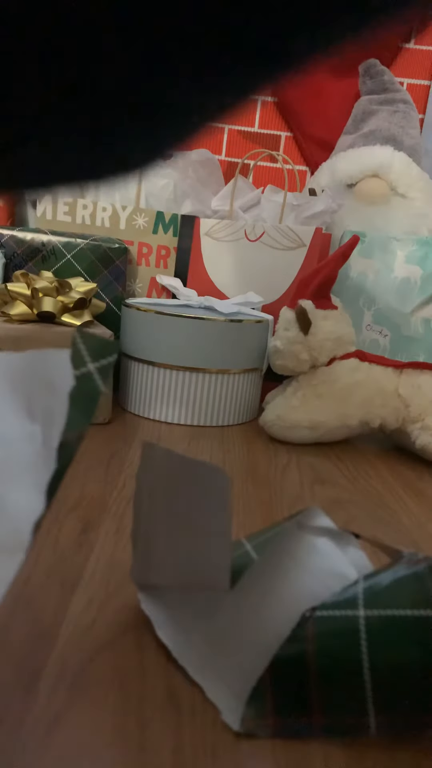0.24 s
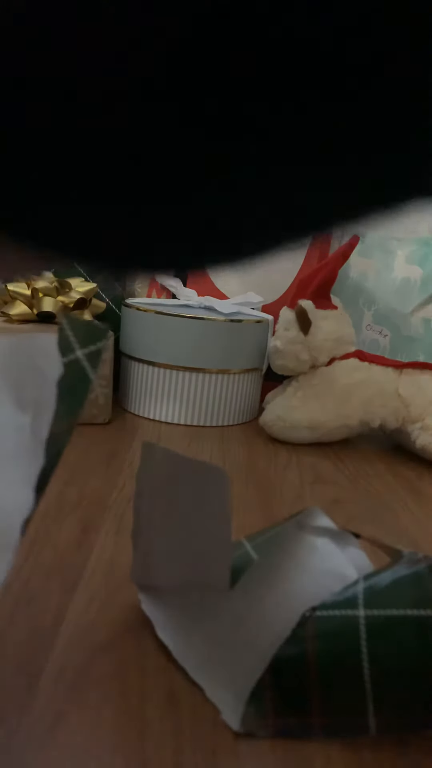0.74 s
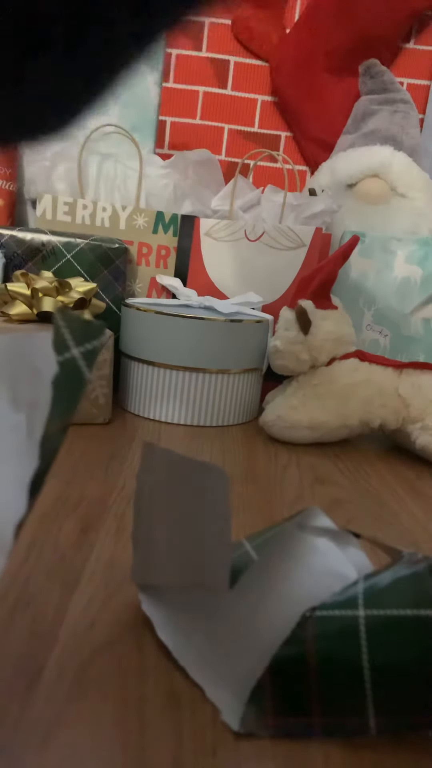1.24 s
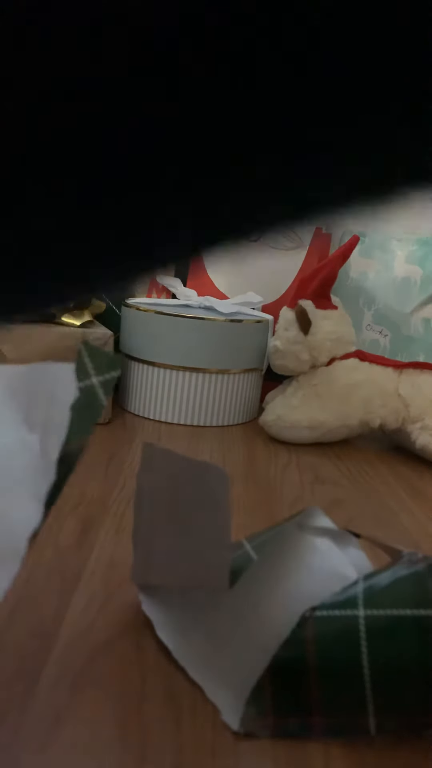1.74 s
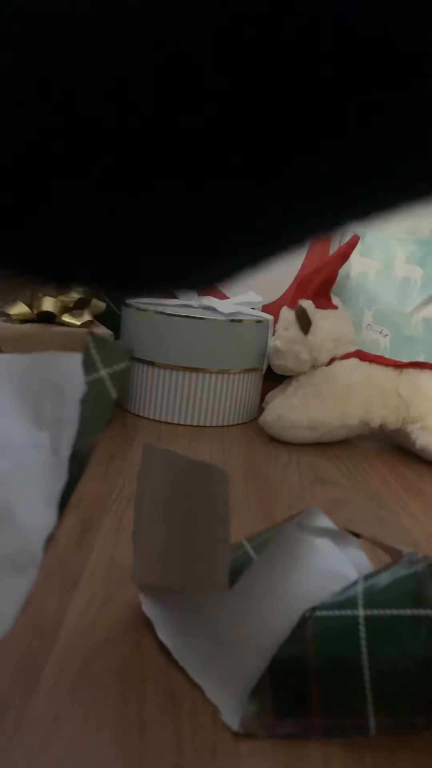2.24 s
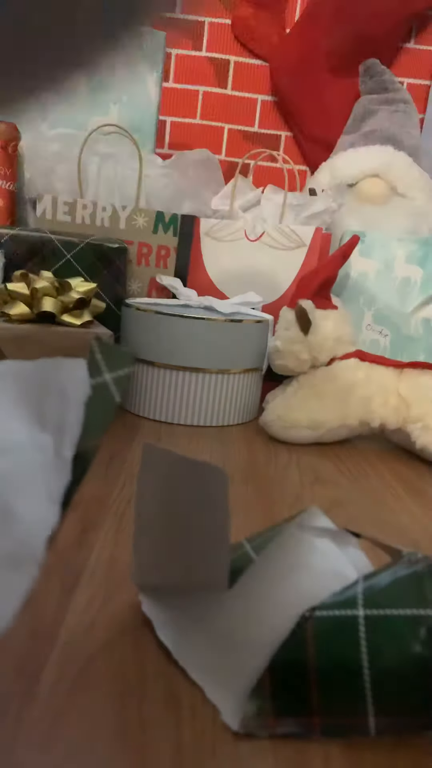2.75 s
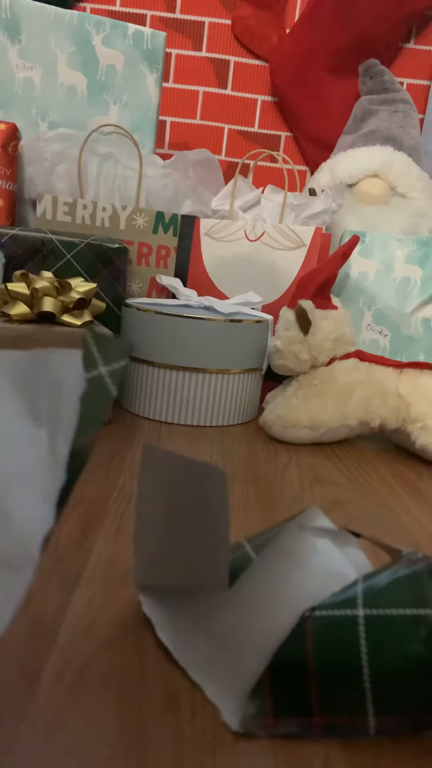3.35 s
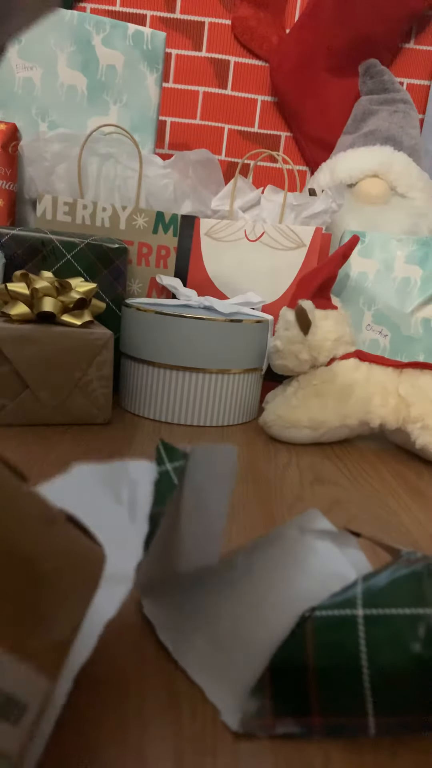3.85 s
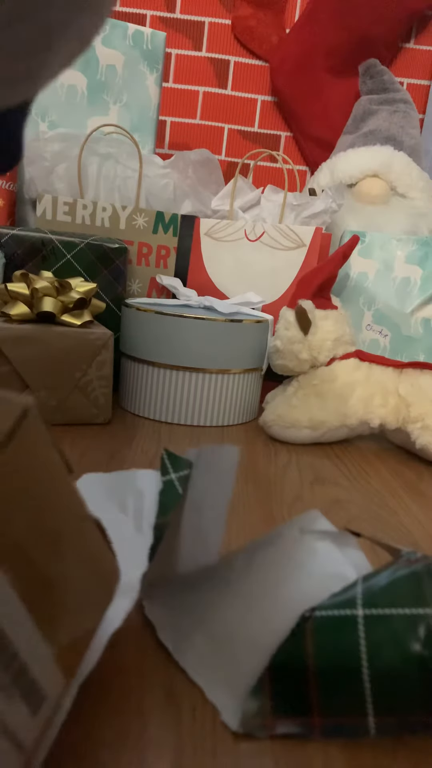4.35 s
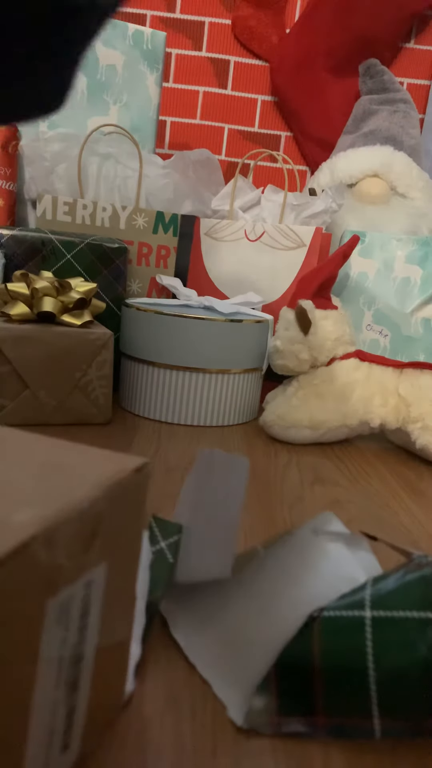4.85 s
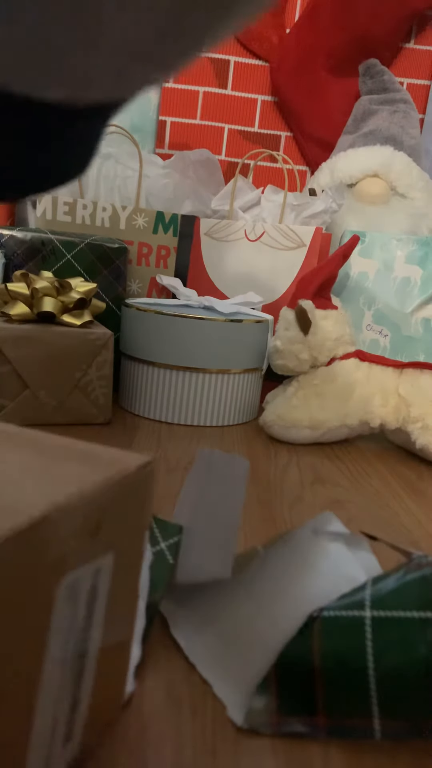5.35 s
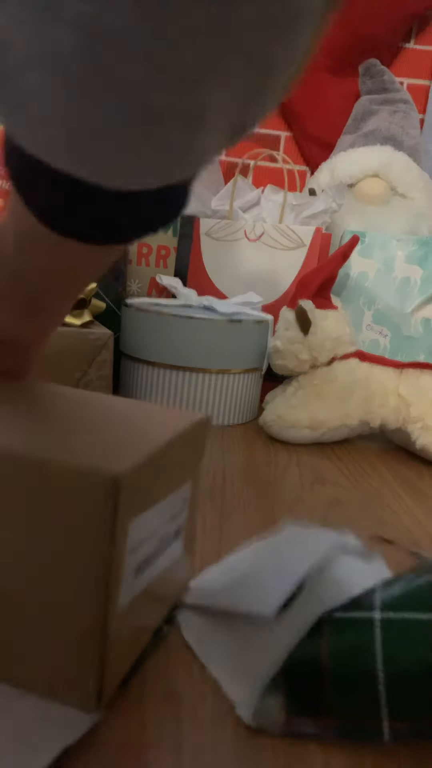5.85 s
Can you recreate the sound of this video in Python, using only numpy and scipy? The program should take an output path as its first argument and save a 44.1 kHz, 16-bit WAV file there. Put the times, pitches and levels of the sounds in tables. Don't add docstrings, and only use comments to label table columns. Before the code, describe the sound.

Close, crisp paper snaps and ripping bursts, with a hollow box drumming and bumping on wood as hands unwrap it indoors.

```python
import sys
import numpy as np
from scipy import signal
from scipy.io import wavfile
from scipy.ndimage import uniform_filter1d

SR = 44100
rng = np.random.default_rng(int(sys.argv[2]) if len(sys.argv) > 2 else 0)


def master(y):
    cut = np.clip(np.atleast_2d(y).T, -1, 1)
    pcm = np.round(cut * 32767)
    wavfile.write(sys.argv[1], SR, pcm.astype(np.int16))


N = 269892


def gain_of(db):
    return 10 ** (np.asarray(db) / 20)


def evened(x):
    return x / np.sqrt(np.mean(x ** 2) + 1e-20)


def read(points, hz):
    f, value = np.transpose(points)
    return np.interp(np.log(hz + 1), np.log(f + 1), value)


def add(mix, start_s, sound):
    part = mix[max(round(start_s * SR), 0):][:len(sound)]
    part += sound[:len(part)]


def colour(points):
    level_db = np.maximum(read(points, abs(np.fft.fftfreq(4096, 1 / SR))), -100)
    log_gain = np.log(gain_of(level_db))
    taps = np.fft.ifft(np.exp(signal.hilbert(log_gain).conj())).real[:1024]
    return taps / np.linalg.norm(taps)


def coloured(x, points):
    return signal.oaconvolve(x, colour(points))[:N]


def ring(x, hz, width_hz):
    return signal.lfilter(*signal.iirpeak(hz, hz / width_hz, SR), x)


def fibres(count, per_s, spread_db):
    chance, luck, sign = rng.random((count, 3)).T
    size = gain_of(spread_db * np.minimum(-np.log(1 - luck), 4))
    return evened((chance < per_s / SR) * size * np.sign(sign - .5))


def wander(smooth_s):
    size = max(round(smooth_s * SR), 2)
    return evened(uniform_filter1d(uniform_filter1d(rng.standard_normal(N), size), size))


def patchy(x, depth_db):
    z = signal.stft(x, nperseg=256)[2]
    field = rng.standard_normal(z.shape[::-1]).T
    field = uniform_filter1d(uniform_filter1d(field, size=3, axis=0), size=18, axis=1)
    return signal.istft(z * gain_of(depth_db * evened(field)), nperseg=256)[1][:N]


# pitch_hz, level_db (per Hz)
ROOM_TONE = [(18, -60.5), (30, -6.5), (153, -19), (569, -26), (2230, -24.5), (3140, -26), (3770, -24),
             (4420, -46), (16000, -72.5)]


def hush():
    tone = coloured(rng.standard_normal(N), ROOM_TONE)
    return patchy(gain_of(-72.5) * tone, depth_db=7.5)


# time_s, level_db
TABLE_RUMBLE = [(0.0, -40), (0.12, -57), (0.82, -59), (1.21, -41.5), (1.65, -57.5), (2.04, -47),
                (2.32, -60), (3.29, -54.5), (3.63, -57), (4.69, -58.5), (5.13, -60), (5.73, -52),
                (6.12, -55.5)]


def rumble():
    band = signal.butter(2, [60, 190], "band", fs=SR, output="sos")
    low = signal.sosfilt(band, rng.standard_normal(N))
    level_db = np.interp(np.arange(N) / SR, *np.transpose(TABLE_RUMBLE))
    return gain_of(level_db - 7.0 + 4.9 * wander(0.023)) * evened(low)


# time_s, effort_db, box_contact_db
HANDS = [(0, -79.5, 22), (.3, -74.5, 8), (.4, -60.5, 5), (.63, -69, -4), (.8, -88, 28), (1.15, -58.5, 7),
         (1.58, -60, 0.5), (2.4, -61.5, 0.5), (2.62, -61, -2.5), (2.801, -59, 1.5), (3.3, -56.5, 1.5),
         (3.72, -59.5, 0.5), (4.3, -52.5, -21), (4.72, -64, -2), (5.02, -67, 4), (5.17, -85.5, -8),
         (5.93, -53.5, -10), (6.12, -82.5, -2)]
# start_s, hold_s, effort_db, box_contact_db, panel_over_air_db
PULLS = [(0.335, 0.009, -54, 21, -10), (0.418, 0.031, -60.5, 11, -2), (0.492, 0.046, -62.5, 6, -0.5),
         (0.669, 0.027, -56.5, 3, -15), (0.791, 0.013, -63.5, 6, -20), (0.892, 0.028, -66, 22.5, -3.5),
         (1.024, 0.037, -62, 16, -7), (1.056, 0.049, -50, 13, -5), (1.19, 0.0082, -27.5, -26, -10),
         (1.318, 0.19, -51, 3.5, 0), (1.78, 0.15, -27, -9.5, 9), (1.915, 0.091, -31, -5, 4.5),
         (2.014, 0.19, -35, 1.5, 3), (2.186, 0.038, -40, 6, -3.5), (2.221, 0.031, -48, -2, 2),
         (2.655, 0.012, -56, 13.5, -13), (2.825, 0.058, -58, 9.5, -7), (3.018, 0.11, -47, -23, 6.5),
         (3.141, 0.059, -25, -9.5, 0), (3.478, 0.15, -52, -5, -2.5), (3.84, 0.056, -69, 18.5, -1),
         (3.925, 0.083, -58.5, 8.5, 1), (4.38, 0.32, -56, 1, -2), (4.586, 0.026, -42.5, 7.5, -8),
         (5.3, 0.58, -49, 2.5, 6), (5.589, 0.095, -33.5, -11.5, 9.5), (5.704, 0.055, -31, -4.5, -1.5),
         (5.723, 0.092, -35.5, -3.5, -19), (6.004, 0.072, -61, -4.5, -8)]


def pulls():
    rise_db_per_s, sag_db_per_s, release_db_per_s = 904, 9.5, 255
    let_go_db, let_go_s = 8, 0.0078
    rest_panel_db = -3
    t = np.arange(0, N, 32) / SR
    s, effort_db, contact_db = np.transpose(HANDS)
    rest_db = np.interp(t, s, effort_db)
    air_rest_db = rest_db + np.interp(t, s, contact_db)
    power = gain_of(2 * np.array([rest_db, air_rest_db, air_rest_db + rest_panel_db]))
    for start_s, hold_s, db, box_db, panel_db in PULLS:
        late = t - start_s
        after = np.maximum(late - hold_s, 0)
        shape_db = np.minimum(late * rise_db_per_s, -late * sag_db_per_s)
        shape_db = shape_db - let_go_db * (1 - np.exp(-after / let_go_s)) - release_db_per_s * after
        parts_db = np.array([[0], [box_db], [box_db + panel_db]])
        power = power + gain_of(2 * (db + shape_db + parts_db))
    sheet_db, air_db, panel_db = 10 * np.log10(power)
    crisp_db = -52.5 - 11.5 + 1.21 * (sheet_db + 46.0)
    return np.repeat([sheet_db, crisp_db, air_db, panel_db], 32, axis=1)[:, :N]


# pitch_hz, level_db (per Hz)
PAPER_COLOUR = [(820, -16.5), (1400, -2.5), (2300, -2.5), (2820, 0), (3310, -5.5), (3570, -2.5),
                (4510, -1.5), (7590, -0.5), (8500, -10.5), (11000, -19), (18700, -120)]


def paper(x):
    return coloured(x, PAPER_COLOUR)


# pitch_hz, level_db (per Hz)
CRISP_COLOUR = [(4410, -15), (7500, -4.5), (15750, -4), (16000, -32.5), (16300, -39), (16500, -67)]


def crisp_edge(x):
    return coloured(x, CRISP_COLOUR)


# pitch_hz, width_hz, level_db
BOX_AIR = [(228.6, 130, -8.5), (316, 141, 1), (396.4, 180, 0.5), (569, 203, -3)]
# pitch_hz, width_hz, level_db
BOX_PANEL = [(807, 206, 8), (939, 246, 7), (1099, 180, -2)]


def drum(x, modes):
    taps = np.zeros(4096)
    for hz, width_hz, db in modes:
        mode = np.eye(1, 4096)[0]
        for _ in range(3):
            mode = ring(mode, hz, 2 * width_hz)
        taps += gain_of(db) * mode
    return signal.oaconvolve(x, taps / np.linalg.norm(taps))[:len(x)]


def rustle(levels):
    sheet_db, crisp_db, air_db, panel_db = levels
    t = np.arange(N) / SR
    loose = np.clip((-19 - sheet_db) / 25, .55, 1) * np.clip((sheet_db + 72) / 22, .4, 1)
    steady = np.searchsorted((1.0, 1.55, 1.78, 2.24), t) % 2 == 1
    loose = loose * np.where(steady, .5, 1)
    clumps_db = loose * (3.2 * wander(.002) + 2.2 * wander(.008))
    grains = evened(gain_of(clumps_db) * fibres(N, per_s=9000, spread_db=3.1))
    sheet = paper(gain_of(sheet_db - 0.7) * grains)
    sheet = sheet + strip_song(sheet)
    crisp = crisp_edge(gain_of(crisp_db + 9.0) * grains)

    rub_db = 1.05 * clumps_db + 0.56 * loose * wander(0.0086)
    rub = evened(gain_of(rub_db) * fibres(N, per_s=4000, spread_db=2.0))
    air = drum(gain_of(air_db + 1.0) * rub, BOX_AIR)
    panel = drum(gain_of(panel_db - 1.0) * rub, BOX_PANEL)
    grip_ends_s, muffle_hz = 1.65, 930
    muffled = signal.sosfilt(signal.butter(6, muffle_hz, fs=SR, output="sos"), panel)
    muffled = 0.72 * muffled + 0.57 * ring(muffled, 845, 130)
    panel = np.where(np.arange(N) < grip_ends_s * SR, 0.98 * muffled + 0.2 * panel, panel)
    return patchy(sheet + crisp, depth_db=3) + air + panel


# start_s, level_db, patch_hz, burst_s
CRINKLES = [(0.0, -35, 1250, 0.0066), (0.106, -53, 3660, 0.0061), (0.172, -48, 4970, 0.0024),
            (0.2154, -51, 1920, 0.0027), (0.2503, -52, 2500, 0.0051), (0.437, -42, 2500, 0.0056),
            (0.7547, -42.5, 2090, 0.0046), (0.8714, -45, 3600, 0.0025), (0.8799, -50, 3580, 0.0016),
            (0.8879, -46, 3580, .002), (0.9043, -41, 3970, 0.0012), (0.9123, -42, 3700, 0.0034),
            (0.9822, -32, 2820, 0.0029), (1.07, -27.5, 2500, 0.003), (1.082, -31, 3500, 0.0044),
            (1.3623, -50, 1310, 0.004), (5.186, -48.5, 6000, 0.018), (2.428, -41, 10100, 0.0017),
            (2.632, -35, 2510, 0.004), (1.4127, -34, 1330, 0.0071), (2.2143, -23, 1340, 0.0072),
            (2.4647, -54, 1300, 0.0054), (2.53, -52, 2500, 0.0045), (2.8, -46, 3000, 0.0044),
            (2.87, -36.5, 4000, 0.0032), (2.8394, -33, 1430, 0.0063), (3.0175, -40, 3400, 0.0061),
            (3.3462, -31.5, 1960, 0.0022), (3.427, -32, 1300, 0.012), (3.611, -43, 6750, 0.0036),
            (3.623, -31.5, 1300, 0.0043), (3.744, -34.5, 1290, 0.0052), (3.798, -37, 6360, 0.0073),
            (3.81, -31, 3240, 0.0037), (3.875, -36.5, 1080, 0.004), (3.943, -34.5, 7540, 0.007),
            (3.97, -36, 1080, 0.0077), (3.988, -40, 2300, 0.0026), (4.033, -24.5, 1490, 0.007),
            (4.077, -26, 5000, 0.0032), (4.228, -40, 5300, 0.0045), (4.285, -38.5, 5300, .003),
            (4.376, -20, 5440, 0.0016), (4.124, -31, 5370, 0.0043)]
GRIP_SNAPS = [(0.0475, -33, 1560, 0.0098), (0.1386, -36, 1390, 0.0066), (0.3134, -34, 1320, 0.0036),
              (0.3262, -20, 1800, 0.0031), (0.3487, -28.5, 2010, 0.008), (0.422, -44, 1400, 0.0065),
              (0.4945, -47.5, 1700, 0.0053), (0.5304, -45, 3380, 0.0021), (0.692, -56, 1720, 0.0032),
              (0.9315, -30.5, 1700, 0.01), (0.9602, -27.5, 2670, 0.004), (1.0113, -25, 2600, 0.0015),
              (1.0284, -30.5, 2530, 0.0026), (1.045, -21.5, 1830, 0.0027), (1.056, -28.5, 1820, 0.015),
              (1.0967, -24, 1280, 0.002), (1.107, -26, 4140, 0.0023), (1.146, -19, 4500, 0.0075),
              (1.1553, -18, 5540, 0.0035), (1.1802, -1, 2720, 0.0056), (1.1918, -20, 2860, 0.0041),
              (1.199, -24.5, 6740, 0.011), (1.211, -16, 7240, 0.0074), (1.378, -29, 4350, 0.0036),
              (1.483, -26.5, 4600, 0.0042)]
PEEL_SNAPS = [(1.5898, -15, 5050, 0.0025), (1.6282, -20.5, 3830, 0.0036), (1.694, -20, 1900, 0.0046),
              (1.7334, -15, 1970, 0.0036), (1.746, -17, 4330, 0.0095), (1.763, -8.5, 4230, 0.0037),
              (1.7765, -14, 1960, 0.0074), (1.797, -17, 6160, 0.0071), (1.8187, -9, 3630, 0.0025),
              (1.838, -10.5, 3300, 0.004), (2.144, -18.5, 2610, 0.0055), (2.182, -22.5, 1110, 0.0052),
              (2.288, -27, 1550, 0.0012), (2.319, -32.5, 5040, 0.014), (2.3488, -16.5, 2030, 0.0055),
              (2.638, -24.5, 1420, 0.0036), (2.6465, -32, 2520, 0.013), (2.671, -25, 1300, 0.0027),
              (2.7484, -29, 2630, 0.0046), (2.7736, -33, 1470, 0.0023), (2.98, -34, 2940, 0.005),
              (3.0594, -8, 3150, 0.004), (3.077, -13, 1400, 0.0017), (3.117, -13, 4210, 0.0014),
              (3.1253, -8.5, 7200, 0.0048), (3.14, -4, 5200, 0.0071), (3.263, -23, 3920, 0.0047),
              (3.3727, -27, 2110, 0.004), (3.3857, -15.5, 2280, 0.0079)]
FLAP_SNAPS = [
    (3.4796, -0.5, 3360, 0.0014),
    (3.489, -33, 3190, 0.0039),
]
SPRING_SNAPS = [
    (3.537, -11, 3070, 0.0079),
    (3.5514, -17.5, 3640, 0.0057),
    (3.5648, -16, 3400, 0.008),
]
TURN_SNAPS = [(3.517, -17, 3250, 0.0024), (3.7603, -26.5, 2860, 0.0078), (3.818, -29.5, 2020, 0.0043),
              (4.0276, -22.5, 1510, 0.0055), (4.0684, -18.5, 1980, 0.0045), (4.09, -31, 5360, 0.0039),
              (4.1163, -23, 4850, 0.0061), (4.164, -30, 4840, 0.0079), (4.202, -7, 5070, 0.0024),
              (4.21, -17, 6100, 0.016), (4.217, -35, 7000, 0.012), (4.248, -15, 7200, 0.0023),
              (4.263, -24.5, 5200, 0.0084), (4.3066, -22, 7200, 0.0076), (4.3264, -30, 5400, 0.0023),
              (4.3344, -23, 5300, 0.0015)]
LOOSE_SNAPS = [(4.3545, -28, 5200, 0.0028), (4.367, -24, 5030, 0.01), (4.3899, -15.5, 5150, 0.0071),
               (4.403, -25.5, 3280, 0.0067), (4.4226, -17.5, 3000, 0.0025), (4.4407, -15.5, 2130, 0.0054),
               (4.467, -32, 2340, 0.0051), (4.5135, -5.5, 2100, 0.0016), (4.5214, -32, 1900, 0.014),
               (4.5336, -7.5, 4000, 0.0051), (4.552, -8, 3550, 0.0076), (4.5717, -11, 5130, 0.003),
               (4.582, -12.5, 1940, 0.0045), (4.607, -14, 4130, 0.00099), (4.6468, -32.5, 4590, 0.0042),
               (4.757, -33, 805, 0.0079), (4.771, -28, 4700, 0.0013), (4.8225, -31, 4680, 0.0046),
               (4.8293, -17, 4000, 0.0016), (4.8444, -25.5, 4510, 0.0073), (4.8564, -27.5, 1320, 0.0086),
               (4.906, -26, 2750, 0.0018), (4.9115, -16.5, 4080, 0.0031), (4.9186, -25.5, 2760, 0.012),
               (4.9727, -29.5, 2650, 0.0063), (5.2007, -15, 2290, 0.0022), (5.216, -18, 5150, 0.0058)]
RIP_SNAPS = [(5.2445, -32, 4200, 0.0029), (5.2585, -8, 4840, 0.0052), (5.2805, -15.5, 4630, 0.0012),
             (5.2873, -11.5, 4040, 0.0061), (5.2994, -11, 1140, 0.0023), (5.32, -16, 7200, 0.004),
             (5.3283, -14.5, 3100, 0.011), (5.351, -17, 7600, 0.0023), (5.364, -11, 7250, 0.002),
             (5.3832, -7.5, 7500, 0.004), (5.3921, -10.5, 5400, 0.004), (5.405, -16.5, 1150, 0.0086),
             (5.4157, -17, 2800, 0.008), (5.4265, -31.5, 2650, 0.016), (5.44, -8.5, 1420, 0.0027),
             (5.46, -10, 2800, 0.0055), (5.48, -8, 1430, 0.0012), (5.496, -15, 7500, 0.0076),
             (5.508, -19.5, 1770, 0.0055), (5.522, -7, 2530, 0.0017), (5.5485, -9, 7450, 0.0039),
             (5.557, -14, 2600, 0.0094), (5.568, -14.5, 2840, 0.0025)]
RIP_END_SNAPS = [(5.589, -14.5, 2880, 0.0088), (5.603, -15, 3600, 0.0037), (5.622, -9.5, 8050, 0.0022),
                 (5.636, -4.5, 9200, 0.002), (5.657, -11, 7160, 0.0026), (5.672, -28, 5260, 0.0044),
                 (5.701, -15, 5100, 0.0097), (5.733, -20, 5460, 0.0072), (5.764, -16, 5600, 0.004),
                 (5.7896, -8.5, 5600, 0.0013), (5.802, -18, 4680, 0.0042), (5.821, -27, 1310, 0.0077),
                 (5.844, -13.5, 4700, 0.0083), (5.858, -33, 4500, 0.0038), (5.872, -9.5, 5200, 0.0028),
                 (5.879, -18, 4030, 0.0062)]
RIP_MORE_SNAPS = [(5.253, -23, 5000, 0.0077), (5.312, -28, 6000, .002), (5.332, -13.5, 1255, 0.0057),
                  (5.367, -10, 7050, 0.0024), (5.484, -12, 7600, 0.0053), (5.522, -16.5, 2740, 0.0053),
                  (5.573, -16, 2800, 0.0043), (5.601, -6.5, 3750, 0.0022), (5.64, -5.5, 10100, 0.0013),
                  (5.644, -15, 7500, 0.0026), (5.677, -21, 5500, 0.0048), (5.74, -27, 6000, 0.0029),
                  (5.753, -26, 5660, .003), (5.762, -22, 4200, 0.0024), (5.785, -26.5, 5450, 0.0017),
                  (5.859, -10, 4780, 0.0021), (5.875, -32, 4350, 0.0026)]


def creases():
    rip = RIP_SNAPS + RIP_END_SNAPS + RIP_MORE_SNAPS
    # snaps, box drum dB, drum dB per dB of snap, crispness dB
    groups = [(CRINKLES, -7.5, -0.16, -9), (GRIP_SNAPS, 0.37, -0.35, -6), (PEEL_SNAPS, -2, -0.71, -5),
              (FLAP_SNAPS, 0.5, -0.95, 6.6), (SPRING_SNAPS, -3.5, -0.75, 19.7),
              (TURN_SNAPS, -1.5, -0.36, -0.092), (LOOSE_SNAPS, -8, -0.07, 16.5), (rip, -13, -0.066, 23.8)]
    found = []
    for rows, drum_db, slope, edge_db in groups:
        for start_s, db, hz, burst_s in rows:
            box_db = drum_db + slope * (db + 31.5) - 3.24 * np.log2(hz / 2000)
            found.append((start_s, db, hz, box_db, burst_s, edge_db))
    return found


def snaps(levels):
    sheet, patches, box, crisp = np.zeros((4, N))
    t = np.arange(1800) / SR
    patch_share, patch_width = .36, .09
    overtones = np.array((1, 1.55, 2.3))
    for s, db, hz, box_db, burst_s, edge_db in creases():
        u = t / np.clip(burst_s, .0015, .02)
        hump = u ** .45 * np.exp(-1.6 * u ** 3)
        shape = hump + .05 * gain_of(-20 * t / .012) * (1 - np.exp(-u))
        run = shape * fibres(len(t), per_s=16000, spread_db=1.5)
        run *= gain_of(db - 5.0) * np.linalg.norm(shape) / np.linalg.norm(run)

        thin = signal.lfilter(*signal.butter(2, 0.23 * hz, "high", fs=SR), run)
        dull_hz = min(3.25 * hz * gain_of(min(edge_db, 4)), SR / 3)
        body = signal.lfilter(*signal.butter(1, dull_hz, fs=SR), 0.67 * thin + 0.27 * run)
        add(sheet, s, 0.76 * body)

        width_hz = patch_width * hz
        for f in np.minimum(hz * overtones ** rng.uniform(.8, 1.2), SR / 3):
            level = patch_share * hz / f * np.sqrt(SR / (np.pi * width_hz))
            add(patches, s, level * ring(run, f, width_hz))

        slide_db = (levels[1] - levels[0])[round(s * SR)]
        crisp_db = .5 * slide_db + 0.41 * np.log2(hz / 3000)
        add(crisp, s, gain_of(crisp_db + edge_db - 27.0) * run)
        add(box, s + 0.001551, gain_of(box_db + 6.0) * run)
    sheet = patchy(paper(sheet), depth_db=2.2)
    box = gain_of(-5.0) * drum(box, BOX_AIR) + gain_of(-3.5) * drum(box, BOX_PANEL)
    return sheet + patches + crisp_edge(crisp) + box


# start_s, peak_db, pitch_hz, t60_s
THUMPS = [(0.042, -59.5, 114, 0.17), (0.326, -31.5, 143, 0.097), (0.7, -39.5, 141, 0.043),
          (0.94, -43, 200, 0.079), (1.189, -41, 220, 0.15), (1.801, -44, 200, 0.043),
          (2.467, -44, 236, 0.063), (2.656, -43, 179, 0.062), (2.875, -45.5, 147, 0.062),
          (4.027, -48, 160, 0.035), (4.601, -30.5, 174, 0.082), (5.82, -27, 103, 0.13)]


def thumps():
    out, t = np.zeros(N), np.arange(14000) / SR
    for s, db, hz, t60 in THUMPS:
        rise = 1 - np.exp(-t / 0.0036)
        tone = np.sin(2 * np.pi * hz * (t + 0.0029 * (1 - np.exp(-t / 0.0037))))
        rattle = evened(ring(rng.standard_normal(len(t)), 1.02 * hz, 89))
        floor = evened(ring(rng.standard_normal(len(t)), 130, 77)) * gain_of(-60 * t / 0.43)
        blow = gain_of(-60 * t / max(t60, .03)) * (tone + 1.53 * rattle)
        add(out, s, gain_of(db + 6.5) * rise * (blow + 0.22 * floor))
    return out


# start_s, peak_db, pitch_hz
KNOCKS = [(0.05, -27, 950), (0.062, -45, 300), (0.085, -44, 480), (0.143, -46, 760), (0.328, -22, 800),
          (0.35, -27, 750), (0.423, -42, 850), (0.497, -36, 330), (0.8, -34, 296), (0.892, -43, 781),
          (0.936, -27, 260), (0.963, -40, 1000), (1.013, -31, 320), (1.034, -33, 800), (1.061, -28, 340),
          (1.066, -32, 780), (1.086, -33, 760), (1.11, -33, 380), (1.15, -29, 388), (1.186, -18, 900),
          (1.19, -26, 345), (1.304, -34, 230), (1.367, -31, 813), (1.382, -39, 760), (1.425, -31, 330),
          (1.471, -37, 245), (2.87, -37, 330), (3.595, -33, 380), (4.615, -22, 230)]


def knocks():
    out, t = np.zeros(N), np.arange(4000) / SR
    for s, db, hz in KNOCKS:
        detune, phase = rng.random(2)
        neighbour = np.sin(2 * np.pi * (hz * (1.5 + .2 * detune) * t + phase))
        pair = np.sin(2 * np.pi * hz * t) + 0.45 * neighbour
        fade = gain_of(db - 60 * t * hz ** 0.51 * 12 / 11)
        add(out, s, fade * (1 - np.exp(-t / .0015)) * pair)
    return out


# time_s, pitch_hz, share
LONG_STRIP = [
    (1.77, 7100, 0.34),
    (1.812, 6430, 2.1),
    (1.821, 3400, 2.6),
    (1.85, 3160, 3.3),
    (1.9, 2820, 2.4),
    (1.92, 2300, 1.5),
    (2.05, 2260, 1.9),
    (2.18, 2570, 1.2),
    (2.26, 2400, .1),
]
# time_s, pitch_hz, share
LAST_STRIP = [
    (5.64, 6660, .1),
    (5.68, 5630, 1.5),
    (5.73, 5870, 1.5),
    (5.8, 5700, 1.5),
    (5.86, 5230, 1.4),
    (5.911, 4800, 0.74),
]


def strip_song(sheet):
    t, song = np.arange(N) / SR, np.zeros(N)
    r = np.exp(-np.pi * 520 / SR)
    for strip in (LONG_STRIP, LAST_STRIP):
        s, hz, share = np.transpose(strip)
        turn = np.exp(2j * np.pi * np.cumsum(np.interp(t, s, hz)) / SR)
        drive = np.interp(t, s, share, 0, 0) * sheet / turn + 1e-18
        song += 2 * (turn * signal.lfilter([1 - r], [1, -r], drive)).real
    return song


# pitch_hz, t60_s
ROOM_DECAY = [(250, 0.18), (1300, 0.11), (4000, 0.098), (10000, 0.088)]


def room(x):
    taps = np.zeros(SR // 2)
    at = np.arange(160, SR // 2 - 20, 20)
    taps[at + rng.integers(0, 20, len(at))] = rng.choice([-1., 1.], len(at))
    hz, t, z = signal.stft(taps, SR, nperseg=128)
    fade = gain_of(-60 * t / read(ROOM_DECAY, hz)[:, None])
    tail = signal.istft(z * fade, SR, nperseg=128)[1]
    return signal.fftconvolve(x, tail / np.linalg.norm(tail))[:N]


def scene():
    levels = pulls()
    hits = snaps(levels) + knocks()
    rest = rustle(levels) + thumps() + rumble()
    return (hits + gain_of(-9.5) * room(hits) + rest + hush())[None]


def band_limit(x):
    return signal.sosfilt(signal.butter(12, 16830, fs=SR, output="sos"), x)


def record(dry):
    thin = signal.sosfilt(signal.butter(3, 45, "high", fs=SR, output="sos"), dry)
    thin = signal.sosfilt(signal.cheby2(10, 40, 16600, fs=SR, output="sos"), thin)
    return band_limit(thin)


dry = scene()
out = record(dry)
master(out)
```